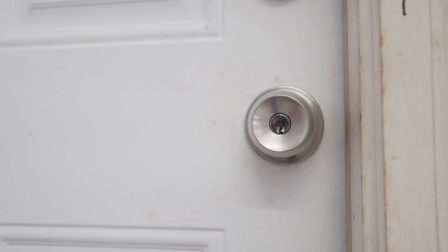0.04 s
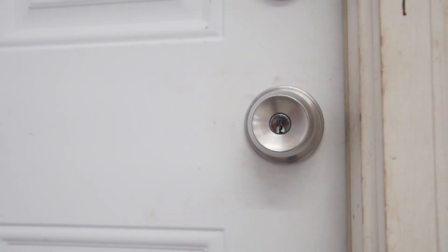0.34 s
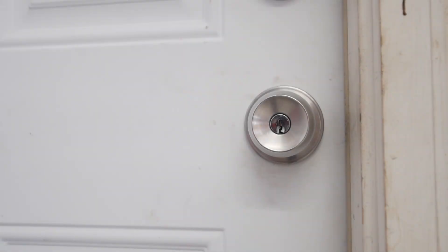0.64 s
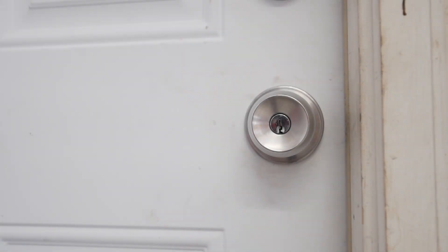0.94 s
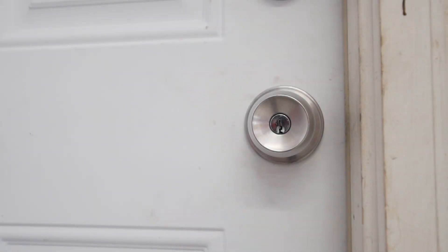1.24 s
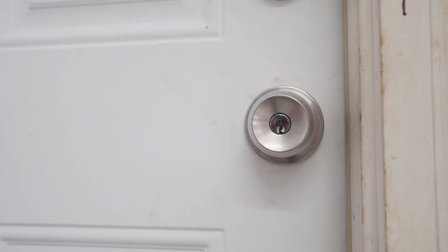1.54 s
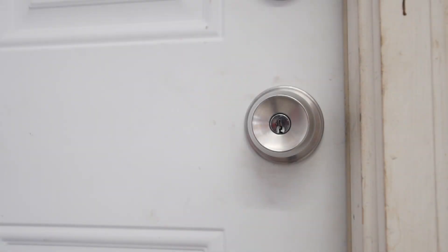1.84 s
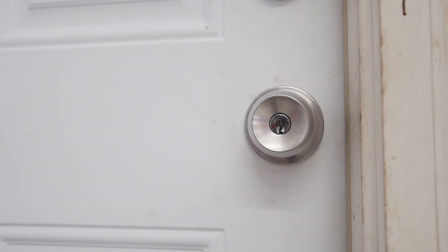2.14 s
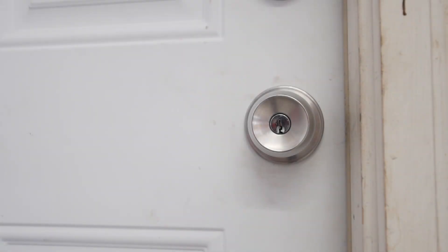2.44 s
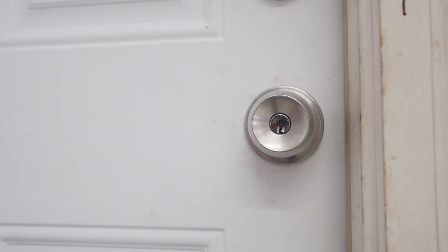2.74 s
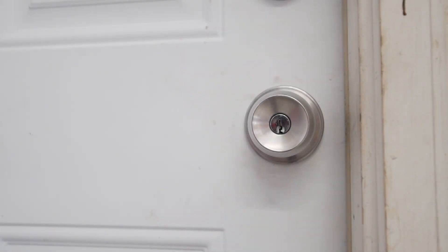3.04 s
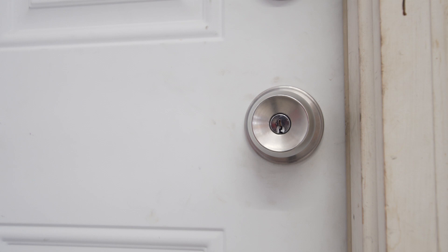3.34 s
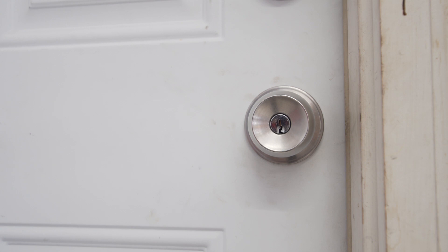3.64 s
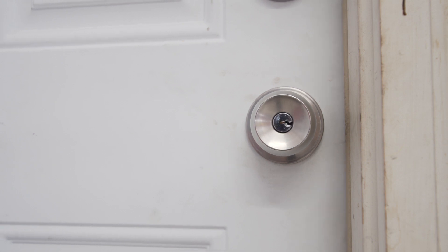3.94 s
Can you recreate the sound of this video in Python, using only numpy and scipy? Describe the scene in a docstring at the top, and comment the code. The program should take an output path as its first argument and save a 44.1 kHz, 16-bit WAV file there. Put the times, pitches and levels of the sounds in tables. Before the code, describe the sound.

A metal door knob turns and rattles after a quiet stretch of faint clock ticking.

```python
"""A quiet room with hard walls, a low hum from the mains and a distant clock ticking once a second.
Two soft bumps come from somewhere in the house. Near the end a metal door knob is turned close by:
the door thuds in its frame, the knob's shaft rubs, the latch knocks and rattles, its spring pings
and the bolt slips off the strike plate. The walls answer the ticks and knocks with short echoes."""
import sys
import numpy as np
from scipy import signal
from scipy.fft import rfft, irfft
from scipy.io import wavfile
from scipy.ndimage import uniform_filter1d

SR = 44100
rng = np.random.default_rng(int(sys.argv[2]) if len(sys.argv) > 2 else 0)


def log_audio(samples):
    """Write samples as a 16-bit WAV file to the path given in sys.argv[1]."""
    # one column per channel
    frames = np.atleast_2d(samples).T
    # limit to full scale, then quantise
    limited = np.clip(frames, -1, 1)
    pcm = np.round(limited * 32767).astype(np.int16)
    wavfile.write(sys.argv[1], SR, pcm)


N = 176400
RING_T = np.arange(SR // 3) / SR  # time within one short sound, in seconds


def amp(db):
    """Turn decibels into a number to multiply by."""
    return 10 ** (np.asarray(db) / 20)


def along(points, hz):
    """Read between (frequency, value) points, giving every octave equal space."""
    p = np.array(points, float)
    return np.interp(np.log(np.maximum(hz, 1)), np.log(p[:, 0]), p[:, 1])


def fade(t60):
    """Die away by 60 dB in t60 seconds, called the fade time in the tables."""
    return np.exp(-np.log(1000) * RING_T / max(t60, 1e-3))


def through(x, response):
    """Pass a sound through something that rings or echoes."""
    return signal.fftconvolve(x, response)[:len(x)]


def click(colour):
    """The shortest click with this colour, that is, this balance of lows and highs."""
    n = len(RING_T)
    gains = amp(along(colour, np.arange(n // 2 + 1) * SR / n))
    cepstrum = irfft(np.log(gains), n)
    cepstrum[1:n // 2] *= 2  # folding it in half packs the energy at the start
    cepstrum[n // 2 + 1:] = 0
    return irfft(np.exp(rfft(cepstrum)), n)


def burst(t60):
    """A dying puff of noise with a total energy of 1."""
    x = rng.standard_normal(len(RING_T)) * fade(t60)
    return x / np.linalg.norm(x)


def ring(tones):
    """A struck object sounds its own tones, each fading from its starting level."""
    return sum(amp(db) * fade(t60) * np.sin(2 * np.pi * hz * RING_T) for hz, db, t60 in tones)


def resonate(tones):
    """How an object rings along with a sound, each tone with its own gain."""
    return sum(2 * amp(db) * fade(t60) / fade(t60).sum() * np.cos(2 * np.pi * hz * RING_T)
               for hz, db, t60 in tones)


def play(events):
    """Place (time, sound) pairs on the time line."""
    out = np.zeros(N + 2 * SR)
    for start_s, sound in events:
        i = SR + int(start_s * SR)
        out[i:i + len(sound)] += sound
    return out[SR:SR + N]


def drift(per_s):
    """Glide between random values, mostly within -1 to 1."""
    step = int(SR / per_s)
    return uniform_filter1d(np.repeat(rng.standard_normal(N // step + 1), step), step)[:N]


# colour of the room's air: f/Hz, level/dB
AIR_COLOUR = [(12, -17), (22, 3.5), (45, -1.5), (75, 2.5), (100, -3), (170, -8), (245, -10), (330, -13),
              (600, -17), (1300, -21), (2000, -24.5), (4500, -30), (8000, -35.5), (15500, -40)]
def air(level_db=-46.5, wander_db=-0.46):
    """A low rumble and soft hiss whose loudness wanders a little."""
    hz = np.arange(N // 2 + 1) * SR / N
    noise = irfft(rfft(rng.standard_normal(N)) * amp(along(AIR_COLOUR, hz)), N)
    return noise / noise.std() * amp(level_db + wander_db * drift(per_s=4.17))


# tones of the hum: f/Hz, level/dB
HUM_TONES = [(59.7, -54.5), (119.6, -55), (241, -65)]
def mains_hum(waver=0.38):
    """The electric supply hums in three low, wavering tones."""
    t = np.arange(N) / SR
    hum = 0
    for hz, db in HUM_TONES:
        strength = np.sqrt(2) * amp(db) * (1 + waver * drift(per_s=5.96))
        hum += strength * np.sin(2 * np.pi * (hz * t + rng.random()))
    return hum


# how long the echoes last: f/Hz, fade time/s
ECHO_FADES = [(200, 0.3), (1200, 0.17), (4500, 0.16), (12000, .17)]
# colour of the echoes: f/Hz, level/dB
ECHO_COLOUR = [(100, -4), (400, 0), (800, 5), (1400, -0.5), (2600, -5), (4300, -1), (8000, -2.5),
               (14000, -3)]
def with_echoes(x, echo_db=-2.5, build_s=0.0013):
    """Add a fresh pattern of dense wall echoes to a sound; the lows last longest."""
    n = len(RING_T)
    hz = np.arange(n // 2 + 1) * SR / n
    noise, echoes = rfft(rng.standard_normal(n)), 0
    swell = 1 - np.exp(-RING_T / build_s)
    edges_hz = np.geomspace(60, SR / 2, 11)
    for lo, hi in zip(edges_hz, edges_hz[1:]):
        centre = np.sqrt(lo * hi)
        band = irfft(noise * (hz >= lo) * (hz < hi), n) * fade(along(ECHO_FADES, centre)) * swell
        band *= np.sqrt(2 * (hi - lo) / SR) / np.linalg.norm(band)  # wider bands get more energy
        echoes += band * amp(along(ECHO_COLOUR, centre))
    return x + amp(echo_db) * through(x, echoes)


# ticks of the clock: t/s, level/dB
TICKS = [(-.010, -2), (.990, -2), (1.987, -0.5), (2.991, -2.5)]
# small clicks within each tick: delay/s, level/dB
TICK_CLICKS = [(-.011, -10), (0, -6), (.008, -5.5), (.016, 1.5), (.030, -6.5), (.081, -7), (.091, -13)]
# colour of a click: f/Hz, level/dB
CLOCK_COLOUR = [(150, -20), (500, 3), (1500, -1), (3500, -1.5), (5800, -12), (7000, -21), (15000, -43)]
# tones of the clock's case: f/Hz, gain/dB, fade time/s
CLOCK_TONES = [(516, 14, 0.091), (545, 15.5, 0.068), (1057, 4, .04), (1247, 7, 0.071), (2130, -15, .03),
               (2520, -6, 0.023), (2900, 8, 0.038), (3390, -12, 0.04), (4690, 3, .012)]
def clock(gain_db=-14, smear_s=0.055):
    """Once a second the clockwork steps and settles; distance smears its clicks."""
    case = click(CLOCK_COLOUR) + resonate(CLOCK_TONES)
    ticks = play((start_s + delay, amp(gain_db + db + click_db) * through(case, burst(smear_s)))
                 for start_s, db in TICKS for delay, click_db in TICK_CLICKS)
    return with_echoes(ticks, echo_db=-4.5)


# bumps in the house: t/s, level/dB
BUMPS = [(1.845, 0), (1.900, -4.5)]
# tones of the wood: f/Hz, level/dB, fade time/s
WOOD_TONES = [(225, -52, 0.15), (345, -49, 0.13), (412, -42, 0.085), (484, -44.5, 0.076)]
def bumps():
    """Bumped wood gives a faint, dull ring."""
    return play((start_s, amp(db) * ring(WOOD_TONES)) for start_s, db in BUMPS)


# the door shifting in its frame: t/s, f/Hz, level/dB
DOOR_THUDS = [(3.638, 61.7, -30), (3.685, 50, -29.5), (3.704, 90, -31.5), (3.757, 33.6, -22),
              (3.800, 75.5, -25.5), (3.84, 55.6, -29), (3.878, 30, -29), (3.919, 32, -21), (3.956, 62, -21),
              (3.980, 75.4, -14.5)]
def door(rise_s=0.0037, fade_s=0.22):
    """Each push sets the whole door shaking with a low tone that soon dies."""
    swell = 1 - np.exp(-RING_T / rise_s)
    return play((start_s, swell * ring([(hz, db, fade_s)])) for start_s, hz, db in DOOR_THUDS)


# how hard the knob's shaft rubs: t/s, level/dB
RUB_LEVELS = [(3.640, -59), (3.690, -49.5), (3.760, -48), (3.785, -38), (3.840, -47), (3.890, -45),
              (3.920, -39.5), (3.965, -43), (4.000, -50)]
# colour of the rubbing: f/Hz, level/dB
RUB_COLOUR = [(100, -11), (300, 7.5), (1500, 3), (2400, -8), (4500, -9), (6000, -20), (15000, -34)]
def knob_shaft(grains_per_s=900, spread_db=3.5):
    """Dry metal sticks and slips in a gritty stream of tiny clicks while the knob turns."""
    t = np.arange(N) / SR
    grains = (rng.random(N) < grains_per_s / SR) * rng.choice([-1, 1], N)
    strengths = amp(spread_db * rng.standard_normal(N))
    grit = through(grains * strengths, click(RUB_COLOUR))
    times, db = np.array(RUB_LEVELS).T
    return grit / grit.std() * amp(np.interp(t, times, db)) * (t > times[0])


def cross_door(x, travel_s=0.000508):
    """The door flexes and carries highs fastest, so a click becomes a chirp; travel_s is for 1 kHz."""
    khz = np.arange(len(x) // 2 + 1) * SR / len(x) / 1000
    phase_lag = 4 * np.pi * 1000 * travel_s * np.sqrt(khz)
    return irfft(rfft(x) * np.exp(-1j * phase_lag), len(x))


# latch knocks: t/s, level/dB in four bands (body, middle, clack, edge), f/Hz of the part that is hit
KNOCKS = [(3.6415, -8, -12, -23, -37, 1300), (3.6465, -12, -4.5, -20, -33, 1300),
          (3.7010, 3, -1, -11, -24, 2880), (3.7035, -2, 12, 10, -6, 1370), (3.7083, -1, 6, -7, -20, 1320),
          (3.7160, 5, 2.5, -22, -21, 1510), (3.7280, 8, 3.5, -10, -28, 585),
          (3.7745, -3, -2, -5, -25, 2680), (3.7980, 3, 1, -11, -26, 1700),
          (3.8016, 12.5, 8.5, -0.5, -14, 1540), (3.8062, 3.5, 5, -3, -20, 2100),
          (3.8160, 9.5, 7.5, -2, -21, 1750), (3.8215, 6, 0, -16, -27, 280), (3.8330, 0, -2, -6, -30, 523),
          (3.8553, 2.5, 10, 11, -12.5, 4140), (3.8572, 6, 4, 7.5, -27, 790),
          (3.8810, -3, -5, -11, -26, 800), (3.9005, 6, -2, -10, -30, 4100), (3.9400, 12.5, 1, -6, -30, 285),
          (3.9450, 5, 0, -10, -30, 280), (3.9602, 4, 3, -6, -30, 1950), (3.9650, 2.5, -1, -12, -30, 230),
          (3.9692, -1, -2, -9, -17.5, 1000), (3.985, 9, -6, -21, -36, 400),
          (3.9876, 14.5, 0, -10, -36, 196), (3.9975, 14, -2, -15, -26, 300)]
# where those four bands lie: f/Hz
KNOCK_BANDS = [300, 1250, 3800, 7000]
# colour of the bare hit: f/Hz, level/dB
HIT_COLOUR = [(40, -20), (200, -6), (700, -5.5), (1350, -7), (2100, -8.5), (3100, -12.5), (4700, -4.5),
              (6200, -8), (9000, -5), (12500, -9.5), (15500, -15)]
# tones of the latch case and door panel: f/Hz, gain/dB, fade time/s
LATCH_TONES = [(257, -2, 0.1), (335, -9, 0.055), (522, -2.5, .07), (805, -6, 0.052), (1080, -10, 0.026),
               (1257, -2.5, 0.022), (1465, -4.5, 0.027), (1750, -17, 0.03), (2180, -10.5, 0.017),
               (2764, -6.5, 0.015), (3180, -6.5, 0.011), (3940, -14, 0.018), (4460, -12.5, 0.012),
               (5080, -17, 0.013)]
def latch(detune=0.017, spread_db=2, part_db=1, part_fade_s=0.016, rattle_db=-2, rattle_fade_s=0.031):
    """Each knock rings the part it hits, the latch case and the door panel, and shakes loose parts."""
    hit, knocks = click(HIT_COLOUR), []
    for start_s, *band_dbs, part_hz in KNOCKS:
        chance = rng.standard_normal((len(LATCH_TONES), 2))  # each spot hit favours other tones
        tones = [(hz * (1 + detune * shift), db + spread_db * boost, t60)
                 for (hz, db, t60), (shift, boost) in zip(LATCH_TONES, chance)]
        body = hit + resonate(tones + [(part_hz, part_db, part_fade_s)])
        push = click(list(zip(KNOCK_BANDS, band_dbs)))
        blow = cross_door(through(push, body))
        rattle = amp(rattle_db) * through(blow, burst(rattle_fade_s))
        knocks.append((start_s, with_echoes(blow + rattle)))
    return play(knocks)


# pings of the spring: t/s, level/dB
PINGS = [(3.8274, -7), (3.8798, -19)]
# tones of the spring: f/Hz, level/dB, fade time/s
SPRING_TONES = [(7916, -37.5, .38), (7980, -45, .09), (8250, -18.5, 0.019), (8460, -41, .01),
                (7300, -43, .006), (10100, -45, .06), (10360, -33.5, 0.041), (12900, -51, .04)]
def spring():
    """The spring that pulls the knob back snaps and keeps a thin, high ring."""
    return play((start_s, amp(db) * ring(SPRING_TONES)) for start_s, db in PINGS)


# slips of the bolt: t/s, ring level/dB, sharp edge level/dB
SLIPS = [(3.9241, -10, -2.5), (3.9283, -3, -14), (3.9305, 0, -5), (3.9335, -6, -17)]
# tones of the bolt: f/Hz, level/dB, fade time/s
BOLT_TONES = [(4170, -35, .033), (4560, -31.5, 0.031), (4920, -32, 0.025), (5076, -32, 0.034),
              (7230, -32, 0.0067), (8870, -31, 0.012), (9200, -31, 0.011), (9540, -44, .012),
              (13800, -40, .006)]
def bolt(edge_hz=6500, crack_db=-25):
    """The bolt sticks and slips over the metal plate in the frame in a quick run of bright clicks."""
    slips = []
    for start_s, ring_db, edge_db in SLIPS:
        tones = [(hz, db + (edge_db if hz > edge_hz else ring_db), t60) for hz, db, t60 in BOLT_TONES]
        crack = amp(crack_db + edge_db) * burst(t60=0.0062)
        slips.append((start_s, ring(tones) + crack))
    return play(slips)


def scene():
    """The hum, the clock and the door share one room, heard in one channel."""
    mix = air() + mains_hum() + clock() + door() + latch()
    small_sounds = bumps() + knob_shaft() + spring() + bolt()
    return (mix + with_echoes(small_sounds))[None]


def record(dry):
    """Round off the sharpest peaks and cut the very highest treble."""
    peak_limit, top_hz = 0.26, 15700
    rounded = dry / (1 + (dry / peak_limit) ** 4) ** (1 / 4)
    return signal.sosfilt(signal.ellip(10, .2, 70, top_hz, fs=SR, output="sos"), rounded)


dry = scene()
out = record(dry)
log_audio(out)
```